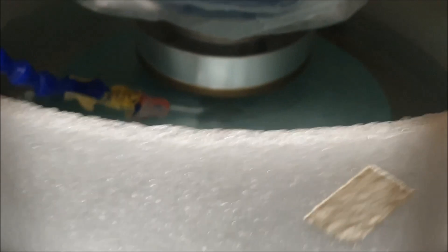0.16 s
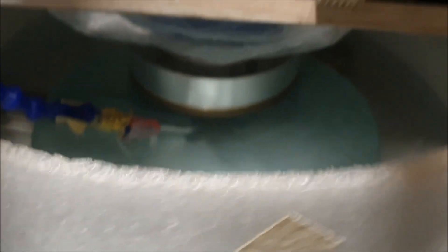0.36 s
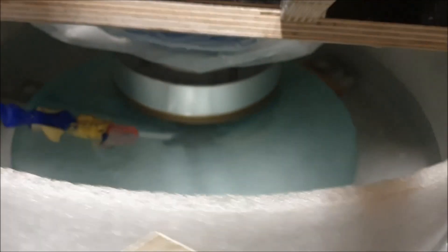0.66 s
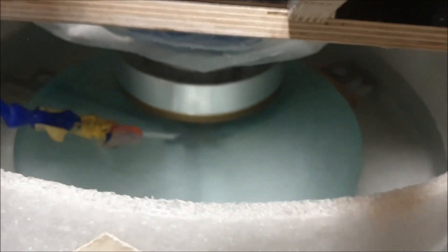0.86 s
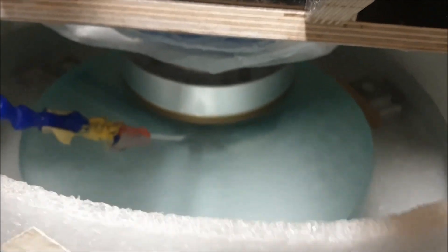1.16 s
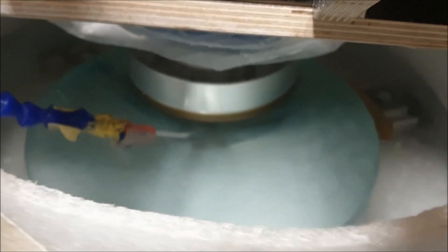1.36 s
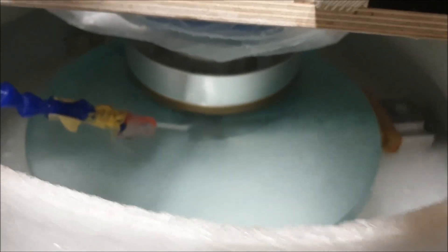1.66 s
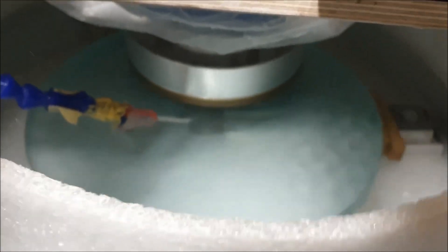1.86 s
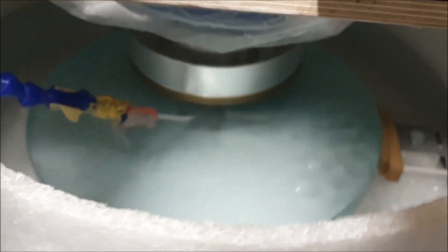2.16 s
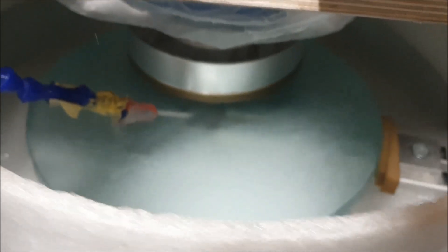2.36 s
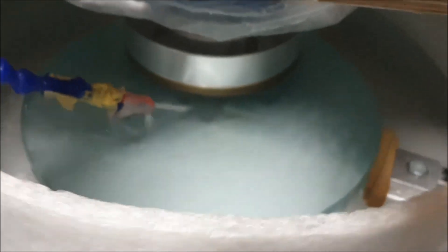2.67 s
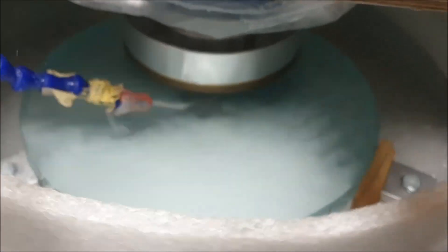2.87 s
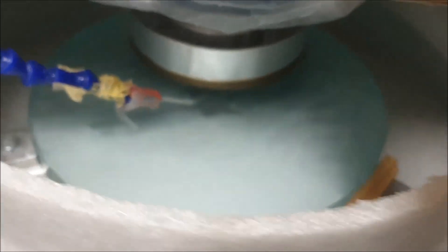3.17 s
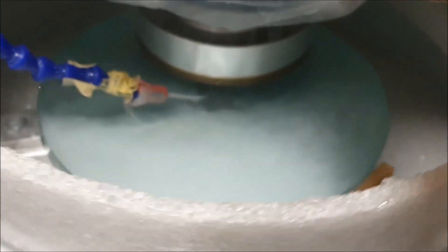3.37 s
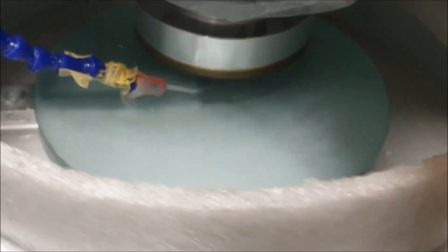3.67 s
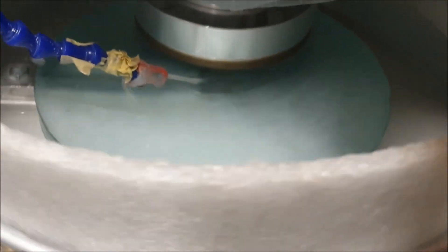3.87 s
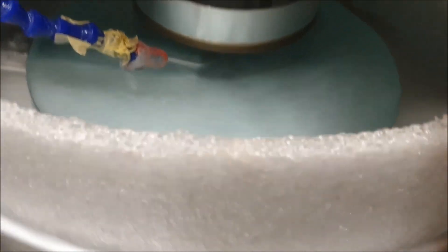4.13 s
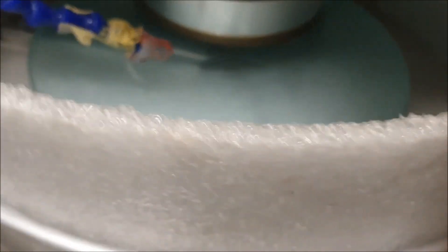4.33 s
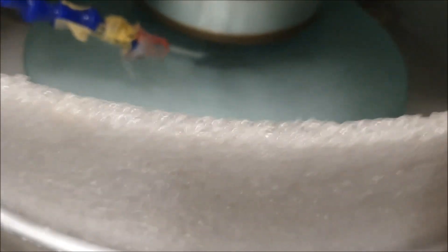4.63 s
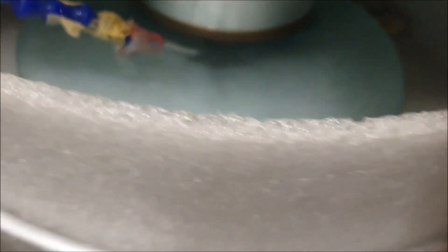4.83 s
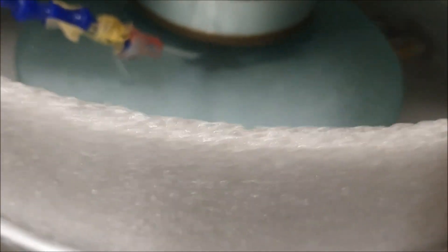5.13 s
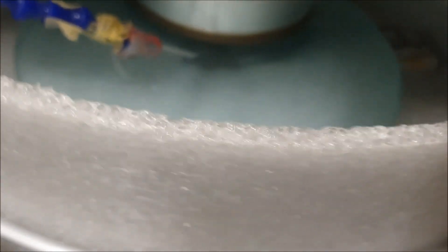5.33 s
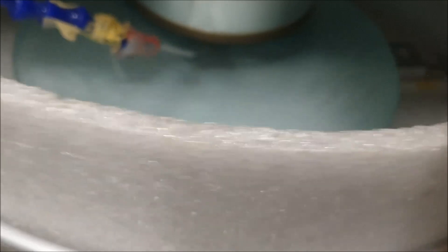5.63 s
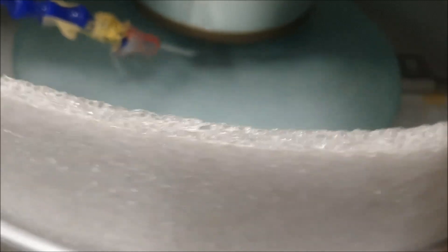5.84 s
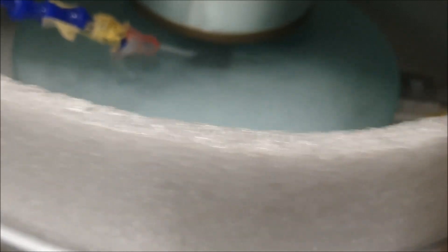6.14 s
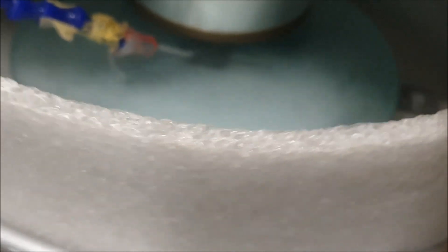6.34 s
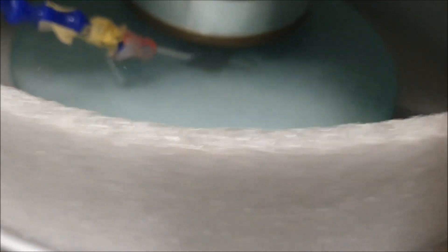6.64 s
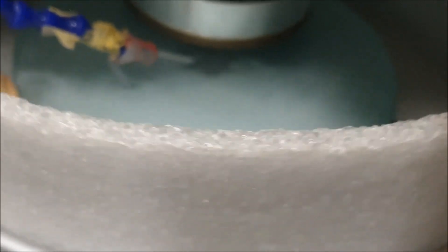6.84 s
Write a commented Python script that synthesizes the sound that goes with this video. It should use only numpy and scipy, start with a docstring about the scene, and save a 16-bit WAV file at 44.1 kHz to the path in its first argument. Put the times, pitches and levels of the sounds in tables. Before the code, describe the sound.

Very close in a workshop, a spinning wheel grinds a wet glass disc. A low motor hum and rumble run throughout, while rapid knocks, about twenty-seven a second, blur into a rough purr with gritty, glassy scraping. Small squeals come early; harder bites follow; the grinding nearly lifts away around five seconds, then returns fuller. Water spray hisses constantly.

```python
"""In a workshop, a cup wheel spinning about 27 times a second grinds a wet glass disc, heard close by at two ports.
High spots of the glass meet the wheel once a turn: each is a short falling burst plus scraping noise, and these
ring spindle, frame, tub and disc as damped modes; the load sways those rings, and near 5 s the wheel almost lifts off.
Sines at whole orders of the spindle speed hum and sing, wavering sines squeal and ring-fed noise sings.
Shaped noise makes the coolant spray and the rumble of motor and turntable; steady sines make the drive's whine."""
import sys
import numpy as np
from scipy import signal
from scipy.fft import rfft, irfft
from scipy.io import wavfile
from scipy.ndimage import uniform_filter1d, map_coordinates

SR = 44100
rng = np.random.default_rng(int(sys.argv[2]) if len(sys.argv) > 2 else 0)


def put_to_file(sound):
    """Save the sound as 16-bit audio at rate SR, in the file named by the first command-line argument."""
    columns = np.atleast_2d(sound).T  # one column per channel
    safe = np.clip(columns, -1, 1)
    whole_steps = np.round(safe * 32767)
    wavfile.write(sys.argv[1], SR, whole_steps.astype(np.int16))


N = 308700

# modes of the spindle: centre_hz, width_hz, gain_db
SPINDLE_MODES = [(393, 4800, -21), (447.4, 10.7, 2), (464, 8.1, 0)]


def undb(db):
    """Decibels to amplitude gain: 20 dB is a factor of ten."""
    return np.exp(np.asarray(db) * (np.log(10) / 20))


def curves(table):
    """Linear interpolation: each column of a table of rows (time_s, ..) at every sample."""
    s, *columns = np.transpose(table)
    return [np.interp(np.arange(N) / SR, s, c) for c in columns]


def level(x, db):
    """Root-mean-square normalisation: scale x to an rms of 1, then apply the gain db."""
    return x * undb(db) / np.sqrt(np.mean(x ** 2))


def follow(x, db):
    """Envelope control: scale so that the level over a few wheel turns follows a curve."""
    power = uniform_filter1d(np.mean(x, axis=0) ** 2, size=6400)
    power = uniform_filter1d(power, size=4800)
    return x * undb(db) / np.sqrt(power + 1e-18)


def walk(rate):
    """Smoothed chance: random levels held 1 / rate s and averaged twice; spread near 1."""
    hold = int(SR / rate)
    steps = np.repeat(rng.standard_normal(N // hold + 1), hold)
    return 1.03 * uniform_filter1d(uniform_filter1d(steps, hold), hold)[:N]


def noise(alike):
    """Partial coherence: white noise at the two ports with a given correlation, as a mid and side sum."""
    mid, side = rng.standard_normal((2, N))
    alike = np.clip(alike, -1, 1)
    opposed = side * np.array([[1], [-1]])
    return (np.sqrt(1 + alike) * mid + np.sqrt(1 - alike) * opposed) / np.sqrt(2)


def bins():
    """Discrete spectrum: the frequency of every bin in Hz, at least 1."""
    return np.maximum(np.arange(N // 2 + 1) * SR / N, 1)


def shape(points):
    """Spectral colouring: gain at every bin, in dB linear over log frequency between (hz, db) points."""
    hz, db = np.transpose(points)
    return undb(np.interp(np.log(bins()), np.log(hz), db))


def ring(x, modes, low_hz, high_hz):
    """Modal superposition: damped resonances, with second-order roll-off outside the radiating range."""
    f = bins()
    body = sum(undb(db) / (1 + 1j * (f * f - hz * hz) / (f * width)) for hz, width, db in modes)
    below, above = 1j * f / low_hz, 1j * f / high_hz
    edges = below ** 2 / (1 + below + below ** 2) / (1 + above + above ** 2)
    return irfft(rfft(x) * body * edges, N)


def sliding_ring(x, hz, width_hz=55):
    """Heterodyne resonance: shift the moving centre to 0 Hz, smooth, shift back; gain 1 at the centre."""
    carrier = np.exp(2j * np.pi * np.cumsum(hz) / SR)
    keep = np.exp(-np.pi * width_hz / SR)
    return 2 * np.real(carrier * signal.lfilter([1 - keep], [1, -keep], x / carrier))


def during(start, end, fade_s):
    """Gating: 1 between two times, with linear fades centred on them."""
    t = np.arange(N) / SR
    return np.clip(np.minimum(t - start, end - t) / fade_s + .5, 0, 1)


def splash_guard(x, t60=0.066, wet_db=-8):
    """Reverberation: dense reflections inside the guard die away exponentially, different at each port."""
    t = np.arange(SR // 4) / SR
    tail = rng.standard_normal((2, len(t))) * undb(-60 * t / t60)
    tail /= np.sqrt(np.sum(tail ** 2, axis=1, keepdims=True))
    return x + undb(wet_db) * signal.oaconvolve(np.atleast_2d(x), tail, axes=1)[:, :N]


def hum(turn, speed, wobble_db=0.5, lag=0.32, boom_width_hz=13.4):
    """Forced vibration: unbalance and motor pull drive whole orders of the speed, lifted near a boom."""
    # steady orders: order (multiple of the speed), level_db
    steady_orders = [(2, -54), (3, -61), (4, -56.5), (5, -62), (6, -58.5), (7, -58.5), (8, -62),
                     (10, -60.5), (11, -61), (12, -61)]
    # broad boom that lifts the nearest low orders: time_s, centre_hz, level_db
    boom_curve = [(0, 150, -42.5), (.8, 143, -48.5), (1.4, 117.4, -51), (2.35, 120, -43), (2.8, 105, -57),
                  (3.3, 80.5, -51), (4.7, 93, -51.5), (5.1, 131, -53), (5.5, 130, -44), (7, 126, -44)]
    # the ninth order, which drones on a resonance of the machine: time_s, level_db
    drone_curve = [(0, -38.5), (1.4, -43), (2, -50.5), (2.35, -43.5), (3.1, -54.5), (3.9, -53), (4.88, -47),
                   (5.12, -58.5), (5.45, -50.5), (6.1, -48), (7, -53.5)]
    centre, boom = curves(boom_curve)
    orders = [(9, undb(curves(drone_curve)[0]))]
    for order, db in steady_orders:
        nearness = np.exp(-((order * speed - centre) / boom_width_hz) ** 2)
        orders.append((order, np.sqrt(undb(db) ** 2 + nearness * undb(boom) ** 2)))
    out = 0
    for order, size in orders:
        angle = 2 * np.pi * (order * turn + rng.random())
        # opposite phase drift in radians, as the listening place drifts through the standing waves
        spread = lag * walk(2.035) * np.array([[1], [-1]])
        out = out + np.sqrt(2) * size * undb(wobble_db * walk(12)) * np.sin(angle + spread)
    return out


def wheel_face(turn, renew=0.823):
    """Periodic roughness: it returns every turn and slowly changes as fresh glass moves under the wheel."""
    face = rng.standard_normal((16, 1600))
    row = np.arange(N) / SR * renew  # rows per second
    column = turn % 1 * face.shape[1]
    return level(map_coordinates(face, [row, column], order=1, mode="grid-wrap"), 0)


def rocking():
    """Amplitude modulation: the wheel head rocks ten times a second, so about every third turn bites harder."""
    return np.cos(2 * np.pi * 10.02 * (np.arange(N) / SR - 2.797))


def contact(turn, speed, attack=0.58, scatter_db=0.5, slip=0.019, light_db=-9.5, full_db=-36, fresh=0.86):
    """Dispersion of bending waves: the fastest, high ones lead each falling burst; grit scrapes with pressure."""
    # high spots, each met once a turn: start_s, end_s, fade_s, wheel_angle_turns, drift_turns_per_s,
    # length_turns, first_hz, last_hz, peak_db when it appears, peak_db when ground away, rocking_swing_db
    high_spots = [(-.3, 1.3, .3, -.225, .01, .07, 1900, 1000, -36, -40, -2),
                  (-.3, 1.35, .2, -.2, 0, .24, 770, 660, -39, -39.5, -1),
                  (-.2, 1.6, .3, -.13, 0, .07, 1750, 1400, -43, -44, 0),
                  (.25, 1.65, .2, -.17, -.02, .22, 480, 430, -42, -38, 0),
                  (.3, 1.6, .3, .44, .04, .08, 1930, 1400, -42, -43, 2),
                  (.95, 2.12, .1, .15, -.02, .24, 490, 450, -42, -42, 0),
                  (.95, 1.7, .15, .52, 0, .28, 480, 440, -41, -40, 0),
                  (1.3, 2.5, .15, -.19, 0, .36, 730, 660, -38, -39, 0),
                  (2.08, 3.5, .2, -.07, .02, .09, 1250, 1000, -41, -41, 4),
                  (2.15, 3.6, .2, .06, -.01, .1, 1200, 1020, -41, -42, 3),
                  (2.12, 2.51, .04, .24, -.7, .42, 485, 435, -37.5, -35.5, 0),
                  (2.45, 3.65, .2, -.03, 0, .12, 900, 640, -37, -39, 3),
                  (2.6, 3.12, .1, -.01, 0, .24, 540, 420, -38, -34.5, 2),
                  (2.9, 4.88, .2, .18, -.02, .14, 700, 570, -41, -42, 1.5),
                  (3.05, 4.45, .2, -.03, 0, .46, 495, 420, -36, -39.5, 1),
                  (3.0, 3.7, .2, -.03, 0, .06, 2100, 1200, -42, -40, 2),
                  (3.6, 4.75, .2, .05, 0, .09, 1150, 850, -41, -43, 2),
                  (3.68, 4.77, .12, -.04, 0, .075, 2050, 1050, -35.5, -32.5, 2),
                  (4.2, 4.88, .15, .03, 0, .09, 1650, 1450, -41, -39, 2),
                  (4.4, 4.95, .2, .04, 0, .36, 500, 420, -44, -48, 1.5),
                  (5.42, 6.15, .2, -.08, .07, .3, 690, 610, -43, -37, 0),
                  (5.58, 6.8, .15, .51, .03, .07, 1850, 1300, -38, -40, -1),
                  (5.55, 7.3, .15, .52, .02, .32, 520, 410, -39.5, -34.5, 0),
                  (5.7, 7.3, .2, .51, .02, .1, 1100, 640, -41, -39, 0),
                  (5.7, 7.3, .2, -.22, .02, .24, 480, 430, -43, -33.5, 0),
                  (5.75, 7, .2, -.15, 0, .06, 1850, 1300, -40, -41, 0),
                  (6.05, 7.3, .3, -.14, 0, .1, 1080, 760, -36, -34, -1),
                  (6.2, 7.3, .2, .6, .04, .09, 1300, 980, -44, -42, 0),
                  (6.25, 7.3, .2, .06, 0, .09, 1120, 900, -42, -37, 0),
                  (6.15, 7.3, .2, .2, 0, .22, 660, 580, -43, -43, 0)]
    # hard knocks, where the wheel bites deeper: time_s, extra_db
    hard_knocks = [(.068, 2), (.44, 1.5), (.512, 3.5), (2.621, 3.5), (2.694, 2), (2.803, 1), (2.913, 1.5),
                   (2.985, 0.5), (3.201, 0), (3.275, 0.5), (3.563, 4.5), (4.211, 3.5), (4.285, 2),
                   (4.393, 1.5), (4.502, 0), (4.61, 2)]
    knock_s = .0045
    t = np.arange(N) / SR
    bite_db = scatter_db * walk(27.9)
    for s, db in hard_knocks:
        bite_db = bite_db + db * np.exp(-np.minimum(((t - s) / knock_s) ** 2, 20))
    slipping = slip * walk(90)  # cycles
    rock = rocking()
    bursts, bearing = np.zeros((2, N))
    for start, end, fade_s, angle, drift, length, first_hz, last_hz, first_db, last_db, swing_db in high_spots:
        present = during(start, end, fade_s)
        on = present > 0
        past = (turn[on] - angle - drift * (t[on] - start)) % 1  # turns since the spot was met
        part = np.minimum(past / length, 1)
        db = np.interp(t[on], [start, end], [first_db, last_db]) + bite_db[on] + swing_db * rock[on]
        press = present[on] * undb(db) * np.sin(np.pi * part ** attack)
        cycles = past / speed[on] * (first_hz + (last_hz - first_hz) * part / 2)
        bursts[on] += press * np.sin(2 * np.pi * (cycles + slipping[on]))
        bearing[on] += press ** 2
    pressure = undb(light_db) + np.sqrt(bearing) / undb(full_db)
    force = pressure * (wheel_face(turn) + fresh * noise(alike=0.44))
    return bursts, force, pressure


def bending(force, slide_db):
    """Plate bending: the disc's modes, plus one that slides as the wheel bears on a new place."""
    # bending modes of the disc: centre_hz, width_hz, gain_db
    disc_modes = [(1574, 78, -1.5), (1666, 100, -1), (1892, 68, 0.5)]
    # centre of the sliding mode: time_s, centre_hz
    slide_curve = [(0, 1670), (1.2, 1550), (2.2, 1702), (3.2, 1600), (3.8, 1720), (4.4, 1556), (4.8, 1510),
                   (5.6, 1824), (6.2, 1660), (7, 1530)]
    modes = ring(force, disc_modes, low_hz=1300, high_hz=2330)
    return modes + undb(slide_db) * sliding_ring(modes, curves(slide_curve)[0])


def knocking(bursts, lag_s=0.00014, knock_db=-0.5, spindle_db=-4, disc_db=-13):
    """Impact excitation: bursts ring spindle and disc, reach the left port late and rattle round the guard."""
    at = np.arange(N)
    spindle = undb(spindle_db) * ring(bursts, SPINDLE_MODES, low_hz=376, high_hz=580)
    disc = undb(disc_db) * bending(bursts, slide_db=0)
    rung = bursts + spindle + disc
    ports = np.array([np.interp(at - lag_s * SR, at, rung), rung])
    return undb(knock_db) * splash_guard(ports, t60=0.1, wet_db=-13)


def grinding(force, pressure, chatter_db=-10, frame_db=-55, frame_knee_db=-7, tub_db=-57,
             disc_db=-56, disc_slope=0.15, slide_db=-1, ring_db=-51.5, ring_slope=-0.039,
             rim_db=-63, rim_slope=-0.61, crunch_db=6, grip=0.014, flutter_db=3):
    """Forced resonance: scraping rings machine, tub and glass; crushed grains keep the glass singing all round."""
    # modes of the frame, of the tub, high rings of the glass, ring of its rim: centre_hz, width_hz, gain_db
    frame_modes = [(689, 17.6, 25), (750, 43, 6)]
    tub_modes = [(964, 20, 1), (1074, 76, 10.5), (1118, 80, 12), (1180, 88, -8)]
    glass_modes = [(2465, 30, -7), (2592, 58, 7), (2693, 38, 9), (2768, 52, 3.5), (3055, 150, -1.5)]
    rim_modes = [(3661, 58, 0)]
    # load on the wheel, all but lifting off near 5 s: time_s, load_db relative to normal
    load_curve = [(0, 1.5), (1.6, 1), (2.4, 2), (3.3, 0), (4.2, 0), (4.7, -10.5), (5.1, -14), (5.4, -10),
                  (5.75, 0), (6.4, 7.5), (7, 6)]
    # spindle chatter, before the offset chatter_db: time_s, relative_db
    chatter_curve = [(0, -37.5), (.9, -39.5), (1.45, -37), (1.8, -42), (2.08, -39.5), (2.17, -44),
                     (2.47, -40), (2.6, -42.5), (2.85, -41.5), (3.6, -32.5), (4.2, -41.5), (5.1, -44.5),
                     (5.6, -40.5), (6.5, -38), (7, -42)]
    load, = curves(load_curve)
    # the tub grows with the load, the frame only up to a knee; the high rings are freest with the load off
    frame_level = frame_db - 10 * np.log10(1 + undb(frame_knee_db - load) ** 2)
    heard = splash_guard(force)
    crushing = pressure ** grip * noise(alike=0.1) * undb(flutter_db * walk(90))
    crushed = heard + undb(crunch_db) * crushing
    spindle = ring(heard, SPINDLE_MODES, low_hz=350, high_hz=540)
    frame = ring(heard, frame_modes, low_hz=624, high_hz=820)
    tub = ring(heard, tub_modes, low_hz=950, high_hz=1410)
    disc = bending(heard, slide_db)
    glass = ring(crushed, glass_modes, low_hz=2060, high_hz=3330)
    rim = ring(crushed, rim_modes, low_hz=3380, high_hz=4650)
    return (follow(spindle, curves(chatter_curve)[0] + chatter_db)
            + follow(frame, frame_level)
            + follow(tub, tub_db + load)
            + follow(disc, disc_db + disc_slope * load)
            + follow(glass, ring_db + ring_slope * load)
            + follow(rim, rim_db + rim_slope * load))


def coolant(pressure, spray_db=-45.0, pulse=0.063, spatter_db=1.7):
    """Broadband droplet noise: water flung off the wheel spatters and pulses with the contact."""
    # spray colour: centre_hz, gain_db
    spray_colour = [(950, 1), (1500, 4.5), (3000, 0.5), (4300, -2.5), (5800, 0), (6700, -4.5), (7500, -1),
                    (8200, -19), (8900, -8), (10200, -3), (11400, -7), (12800, 1.5), (13400, -9),
                    (14000, 0.5), (15000, -4)]
    hiss = noise(alike=0) * pressure ** pulse * undb(spatter_db * walk(700))
    return level(irfft(rfft(hiss) * shape(spray_colour), N), spray_db)


def workshop(rumble_db=-52):
    """Diffuse low-frequency noise: motor and turntable fill the room with a slowly swelling rumble."""
    # rumble colour: centre_hz, gain_db
    rumble_colour = [(20, -33), (45, -12), (70, -7), (120, -3.5), (200, -7), (320, -12), (600, -6),
                     (1000, -21.5), (2000, -20), (4000, -37)]
    swell = undb(.8 * walk(3))
    return level(irfft(rfft(noise(alike=0.99)) * shape(rumble_colour), N), rumble_db) * swell


def whine(waver_db=1.5):
    """Electromagnetic tones: the motor drive's switching tone and its sidebands, as sines."""
    # switching tone and sidebands: pitch_hz, gain_db relative to the main tone
    drive_tones = [(12210, 0), (11768, -19), (11780, -20), (12645, -16)]
    # level of their sum: time_s, level_db
    whine_curve = [(0, -80), (1, -87), (3.8, -69), (4.4, -54.5), (5.1, -55.5), (7, -63.5)]
    t = np.arange(N) / SR
    tones = sum(undb(db + waver_db * walk(8)) * np.sin(2 * np.pi * hz * t) for hz, db in drive_tones)
    return level(tones, curves(whine_curve)[0])


def sung_orders(turn, fade_s=0.39, wobble_db=3.0):
    """Resonant coincidence: high spindle orders that meet a resonance of frame or tub hold a clean tone."""
    # sung orders: start_s, end_s, order (multiple of the speed), level_db
    sung_table = [(.3, 2.3, 26, -58), (5.5, 7.3, 22, -55), (6.15, 7.3, 32, -55.5), (6.2, 7.3, 37, -57)]
    out = 0
    for start, end, order, db in sung_table:
        size = np.sqrt(2) * undb(db + wobble_db * walk(8.7))
        tone = np.sin(2 * np.pi * (order * turn + rng.random()))
        out = out + during(start, end, fade_s) * size * tone
    return out


def squealing(turn, fade_share=0.38, angle=0.42, depth=0.16, swell_db=4, waver_hz=26):
    """Stick-slip friction: it locks onto a mode of the glass, in wavering squeals that pulse once a turn."""
    # squeals and brief chirps: start_s, end_s, pitch_hz, level_db
    squeal_table = [(.68, 1.8, 2566, -54), (.712, .728, 3660, -52), (.787, .805, 3680, -56),
                    (.825, .845, 3660, -52), (.825, .85, 2570, -45), (0.862, .88, 3650, -52.5),
                    (0.93, 1, 2640, -47), (1.008, 1.02, 3700, -56), (1.047, 1.056, 3680, -52),
                    (1.156, 1.167, 3680, -52), (1.15, 1.215, 2670, -47), (1.2, 1.253, 2590, -52),
                    (.9, 1.38, 2676, -55), (.633, .647, 3680, -56), (.752, .768, 3660, -55),
                    (.942, .956, 3640, -55), (.972, .986, 3690, -55), (1.285, 1.357, 2620, -47.5),
                    (1.499, 1.527, 2660, -51), (2.55, 3.677, 1665, -55.5), (3.758, 3.838, 3680, -56),
                    (4.103, 4.135, 2660, -47.5)]
    t, out = np.arange(N) / SR, np.zeros(N)
    waver = np.cumsum(waver_hz * walk(150)) / SR  # cycles
    pulse = 1 + depth * np.cos(2 * np.pi * (turn - angle))
    pulsing = level(pulse * undb(swell_db * walk(55)), 0)
    for start, end, hz, db in squeal_table:
        present = during(start, end, fade_share * (end - start))
        on = present > 0
        out[on] += np.sqrt(2) * undb(db) * present[on] * np.sin(2 * np.pi * (hz * t[on] + waver[on]))
    return out * pulsing


def singing(force, pressure, fade_s=0.33, grip=0.085, rub_db=1):
    """Selective resonance: force and rubbing feed single rings of glass and machine that swell and fade."""
    # rings that sing or sizzle for a while: start_s, end_s, centre_hz, width_hz, level_db
    singing_rings = [(1.902, 3.296, 1080, 120, -55.5), (2.12, 2.55, 2640, 130, -54.5),
                     (2.9, 3.95, 3570, 160, -57.5), (4.077, 5.33, 5600, 680, -60),
                     (4.132, 4.965, 2700, 200, -54), (5.3, 6.396, 2810, 43, -56), (5.6, 6.6, 1645, 49, -59)]
    out = 0
    feed = force + undb(rub_db) * pressure ** grip * noise(alike=0.17)
    for start, end, hz, width, db in singing_rings:
        nearby = signal.lfilter(*signal.iirpeak(hz, 2, fs=SR), feed)
        rung = signal.lfilter(*signal.iirpeak(hz, hz / width, fs=SR), nearby)
        out = out + during(start, end, fade_s) * follow(rung, db)
    return out


def scene():
    """Superposition: all sources add, and the spindle's angle times the hum, contact and squeals."""
    # spindle speed: time_s, speed_turns_per_s
    spin_curve = [(0, 27.335), (.3, 27.058), (1.5, 27.02), (1.9, 27.156), (2.5, 27.173), (2.9, 27.573),
                  (3.4, 27.698), (4.8, 27.679), (5.45, 28.097), (6.05, 27.797), (6.5, 27.698), (7, 27.912)]
    speed, = curves(spin_curve)
    turn = np.cumsum(speed) / SR
    bursts, force, pressure = contact(turn, speed)
    glass = knocking(bursts) + grinding(force, pressure) + singing(force, pressure) + squealing(turn)
    machine = hum(turn, speed) + sung_orders(turn) + whine() + workshop()
    return machine + glass + coolant(pressure)


def record(dry):
    """Port directivity: the right port favours the middle range, the left the top; a low-pass cuts the treble."""
    # left minus right port: centre_hz, difference_db
    port_difference = [(100, -1.5), (250, -1.5), (450, -3), (750, -1), (1100, -5), (1600, -12.5),
                       (2200, -10.5), (2650, -11.5), (3100, -8), (3800, -8.5), (4500, -2), (6000, -1.5),
                       (7500, 13), (10000, 6), (13500, 10), (15500, 5)]
    top_hz = 15800
    ratio = shape(port_difference)
    ports = np.array([ratio, np.ones_like(ratio)]) * np.sqrt(2 / (1 + ratio ** 2))  # total power kept
    heard = irfft(rfft(dry) * ports, N)
    return signal.sosfilt(signal.ellip(12, .1, 80, top_hz, fs=SR, output="sos"), heard)


dry = scene()
out = record(dry)
put_to_file(out)
```